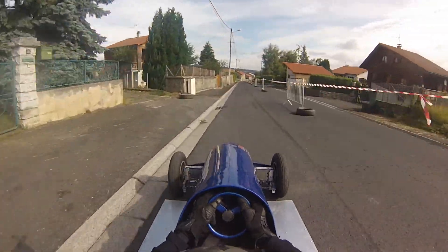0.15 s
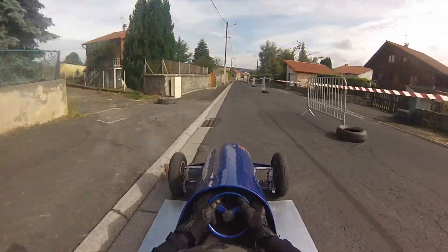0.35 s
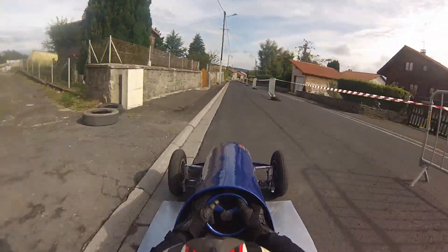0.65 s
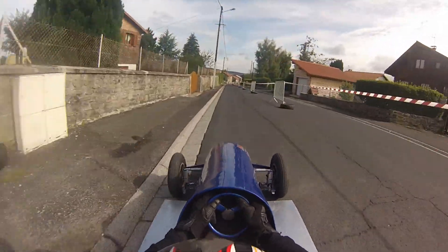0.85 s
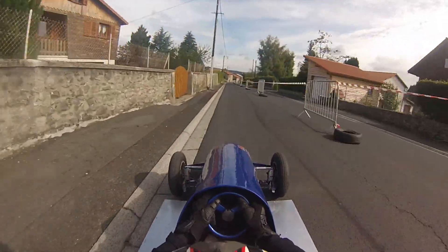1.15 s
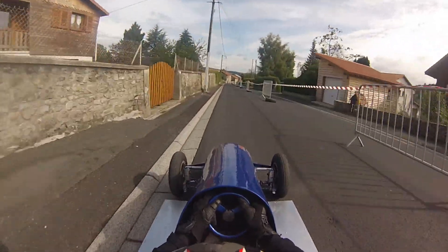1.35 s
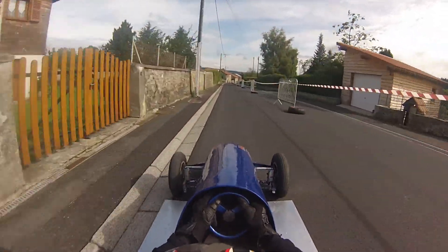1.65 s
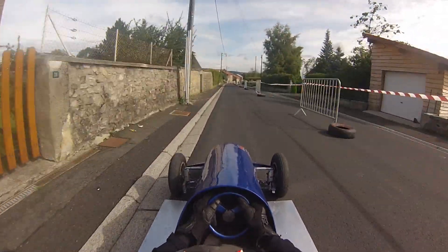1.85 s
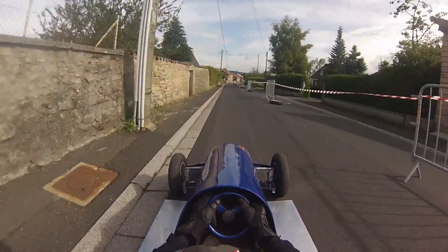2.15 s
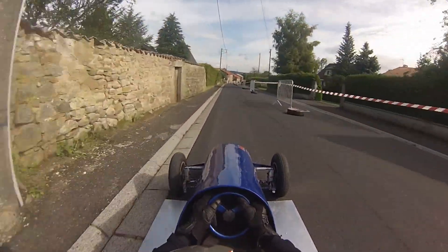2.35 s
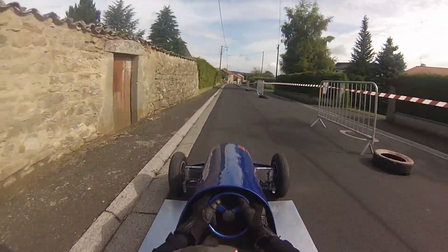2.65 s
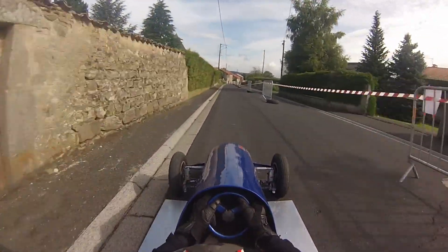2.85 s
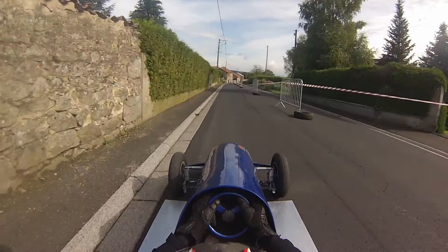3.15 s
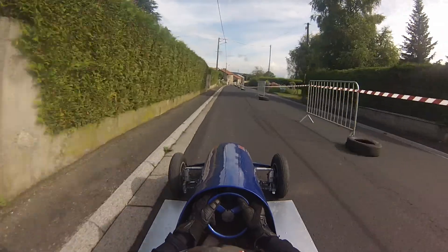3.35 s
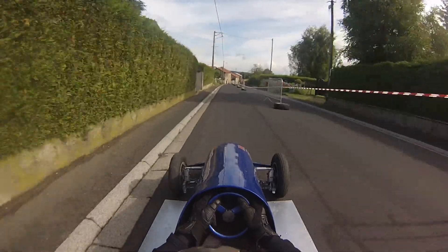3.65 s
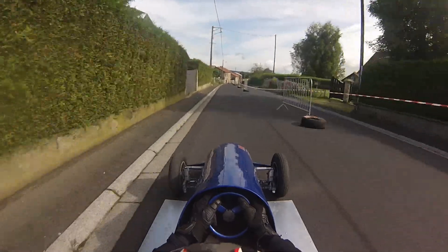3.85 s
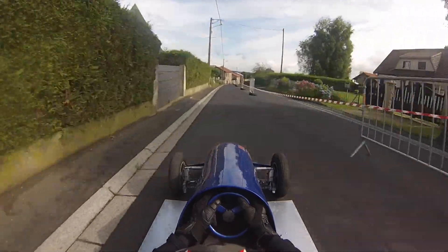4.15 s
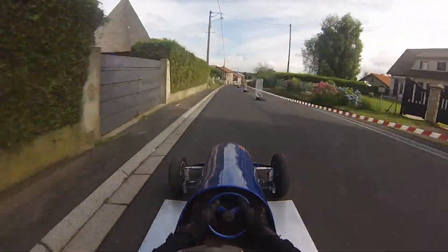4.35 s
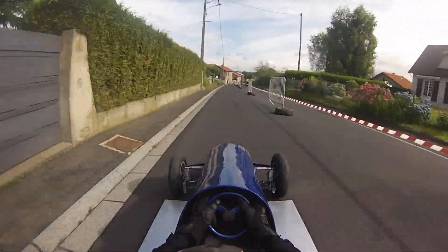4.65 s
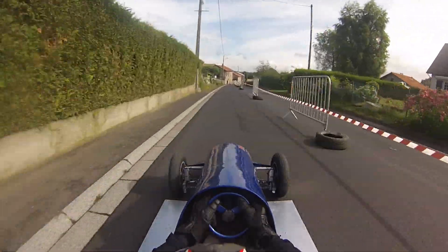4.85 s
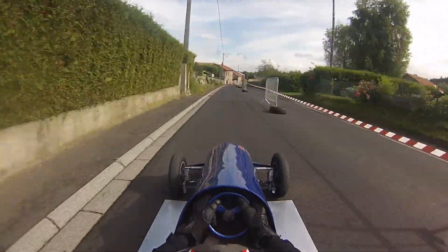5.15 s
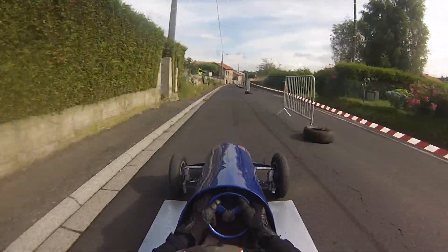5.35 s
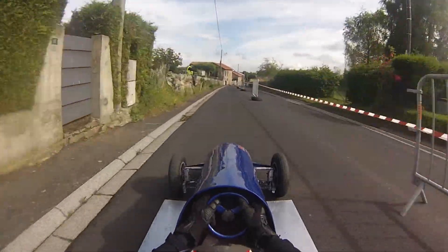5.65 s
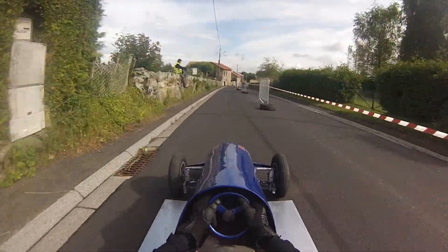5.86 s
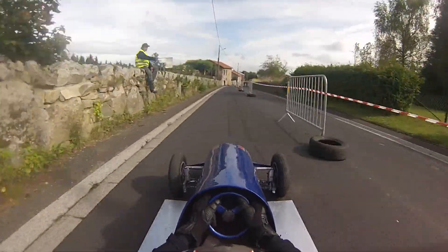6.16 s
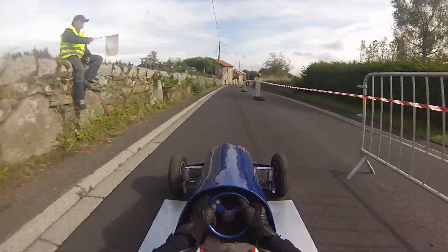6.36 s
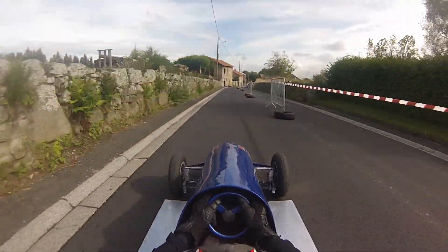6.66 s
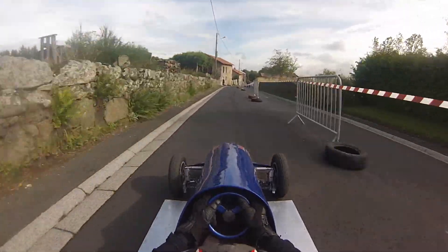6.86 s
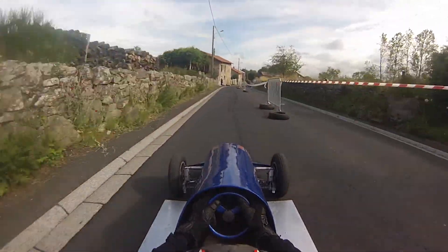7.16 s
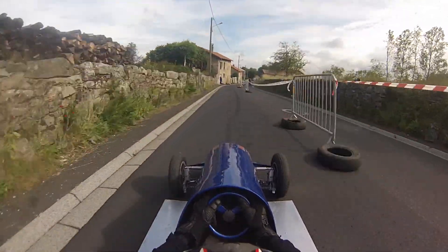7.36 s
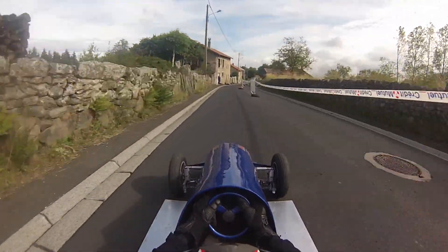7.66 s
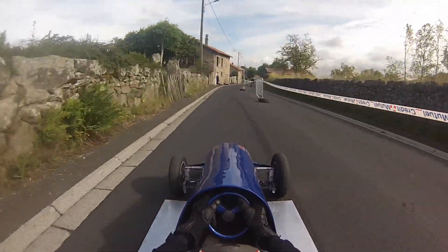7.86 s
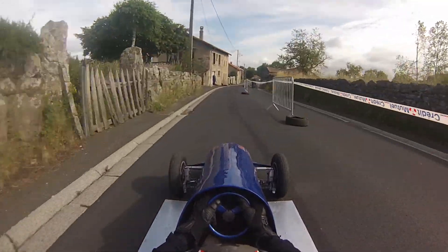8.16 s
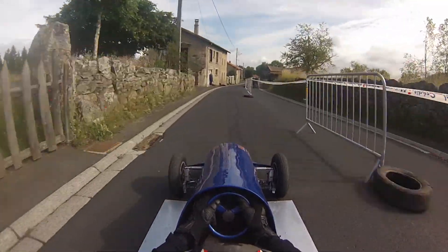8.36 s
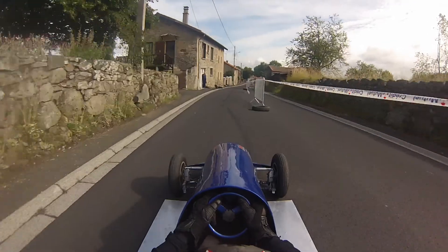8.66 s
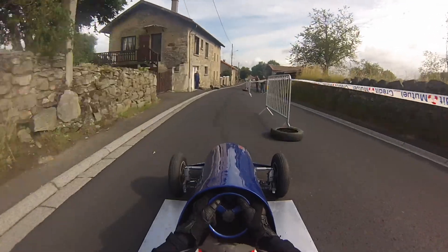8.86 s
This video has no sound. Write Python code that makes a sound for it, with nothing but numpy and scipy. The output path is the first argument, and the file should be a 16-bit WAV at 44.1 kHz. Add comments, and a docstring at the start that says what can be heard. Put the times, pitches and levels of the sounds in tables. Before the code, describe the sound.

Close on board an engineless soapbox car rolling down an open street, a deep, wavering shell boom dominates, with tyre roar and gritty hiss beneath. Early on a wheel drops onto a drain cover with a thud and rattle; hard knocks, tiny jingles and squeaks cluster in the first three seconds. The middle is smoother, with jolts that crackle, then a loud sharp knock comes near the end.

```python
"""A soapbox car's shell booms at about 100 Hz as it coasts down an asphalt street: a shaken resonance.
Below the boom the car bounces on its tyres, wind buffets the microphone, and hard swings crackle.
Coloured noise makes the tyres roar and hiss; short, ringing notes are rubber scrubbing sideways.
Runs of tiny clicks drive ringing parts, so the chassis knocks and loose fittings jingle.
A dry joint squeaks in brief wavering tones, and a drain cover rattles the chassis with a thud."""
import sys
import numpy as np
from scipy import signal
from scipy.fft import rfft, irfft
from scipy.io import wavfile
from scipy.ndimage import uniform_filter1d

SR = 44100
rng = np.random.default_rng(int(sys.argv[2]) if len(sys.argv) > 2 else 0)


def waveform_to_disk(signal):
    """Save audio, clipped to [-1, 1], as 16-bit WAV at the path in sys.argv[1]."""
    frames = np.transpose(np.atleast_2d(signal))
    scaled = np.clip(frames, -1, 1) * 32767
    samples = np.round(scaled).astype(np.int16)
    wavfile.write(sys.argv[1], SR, samples)


N = 397782
TIME = np.arange(N) / SR  # seconds

# how coarse the asphalt is, as the level it stirs up in the tyres: t/s, level/dB
ROAD_COARSENESS = [(0.0, -36), (0.68, -37), (1.0, -45), (1.48, -43.5), (1.71, -41.5), (2.16, -38),
                   (2.59, -40), (2.86, -34.5), (3.04, -38.5), (4.75, -36.5), (5.07, -44.5), (5.98, -41.5),
                   (6.16, -39.5), (6.51, -42.5), (7.08, -37), (7.81, -42.5), (8.11, -37.5), (9.02, -41.5)]
# smooth rises and falls of the bounce over humps and flat stretches: t/s, level change/dB
HUMPS = [(0.5, 4), (0.95, -6.5), (1.19, 10.5), (1.79, -3.5), (3.92, -7.5), (5.84, -8), (6.12, 4.5),
         (7.14, 5.5)]
# low, slow-pulsing wind noise, before its overall level: f/Hz, level/dB
WIND_SPECTRUM = [(10, -15.5), (22, -0.5), (40, -9), (60, 3.5), (80, 4.5), (120, 5), (160, -14), (220, -23),
                 (500, -46.5), (2000, -88.5)]
# fine crackle on the big swings, before its overall level: f/Hz, level/dB
CRACKLE_SPECTRUM = [(200, -14.5), (1500, 6), (3500, 2), (5500, 0), (8000, -5), (12000, -9), (15000, -17.5)]
# body panels that ring above the rolling tyres: f/Hz, width/Hz, lift/dB
PANELS = [(354.3, 50, 10.5), (495, 120, 6.5), (613, 10, 3.5), (886, 45, 7.5), (1003, 89, 10.5),
          (1123, 67, 9), (1387, 180, 11), (1593, 91, 12), (2650, 180, 6.5), (2970, 17, 9), (4520, 53, 7.5)]
# push of the tread and of the grit on the panels, before their overall levels: f/Hz, level/dB
TREAD_SPECTRUM = [(60, -11), (150, 6.5), (220, -5.5), (300, -6), (400, -11.5), (450, -2), (560, 3),
                  (680, 1), (770, -13), (1050, -18.5), (1400, -23.5), (2000, -41.5), (4000, -64)]
GRIT_SPECTRUM = [(300, -18), (800, -3.5), (1450, 3), (1800, -1), (2300, -0.5), (2900, -7), (3300, -12),
                 (5000, -22.5), (7000, -25), (10500, -37.5), (15000, -44.5)]
# coarse patches where the tread roars up: t/s, lift/dB
PATCHES = [(0.38, 3.5), (2.27, 5), (4.38, 4), (4.76, 2.5), (4.98, 2.5), (5.62, 4.5), (6.36, 6)]
# ways the struck chassis rings: f/Hz, width/Hz, lift/dB
CHASSIS = [(553, 67, 0), (990, 67, 8.5), (1370, 370, 7), (1625, 120, 8), (2550, 280, 8), (2870, 140, 7),
           (4220, 210, 9.5)]
# tone of a blow to the chassis, before its overall level: f/Hz, level/dB
BLOW_SPECTRUM = [(60, 5), (170, 6), (260, -4.5), (420, 3.5), (600, -1), (1300, -3), (1650, -4), (1900, -11),
                 (2700, -11), (3200, -19), (4400, -32.5), (5200, -34), (7200, -39.5), (9000, -55),
                 (15000, -57)]
# chassis knocks: t/s, peak level/dB, favoured ring f/Hz, chatter length/s, brightness/(dB per octave)
KNOCKS = [(0.0, -23, 1570, 0.013, 2.5), (0.669, -24, 1340, 0.014, 5), (0.722, -15.5, 1630, 0.008, -2.5),
          (0.746, -24, 2400, .008, -11), (0.816, -12.5, 1430, 0.0065, 0), (1.024, -24, 970, 0.011, 0.5),
          (1.032, -16.5, 1540, 0.012, 0.5), (1.274, -26, 1400, 0.043, -6.5),
          (1.537, -18.5, 920, 0.0092, -3.5), (1.546, -15.5, 1590, 0.019, -1), (1.628, -24, 1300, .012, -7),
          (1.675, -34, 1080, 0.013, -1.5), (2.204, -19.5, 1400, 0.013, 0.5),
          (2.378, -14.5, 1010, 0.0083, -6.5), (2.691, -21.5, 1130, 0.022, -3.5),
          (3.587, -18, 1030, 0.005, -3.5), (3.594, -17.5, 980, 0.018, -2),
          (5.765, -32.5, 976, 0.0071, -0.5), (5.935, -22, 1033, 0.017, -2.5),
          (6.061, -19.5, 970, 0.019, -5), (6.152, -17.5, 1620, 0.0092, -3.5),
          (7.169, -33.5, 1600, 0.011, 5), (8.237, -24.5, 1240, 0.018, -6), (8.684, -23.5, 1020, .01, -1),
          (8.695, -8.5, 980, 0.0085, 1.4), (8.765, -24.5, 810, 0.0077, -7.5),
          (8.851, -22, 1100, 0.0082, -4.5)]
# tone of a clinking fitting, before its overall level: f/Hz, level/dB
CLINK_SPECTRUM = [(600, -24), (1600, 5.5), (2100, -5), (2700, -0.5), (3500, -4), (4000, -16), (5600, -16.5),
                  (7200, -18), (8500, -34), (11000, -26.5), (14000, -41.5)]
# rattles of loose metal fittings: t/s, peak level/dB, chatter length/s
JINGLES = [(0.14, -43, 0.014), (0.25, -41.5, 0.042), (0.312, -34, 0.032), (0.441, -41, 0.011),
           (0.486, -31, 0.025), (0.498, -41, 0.013), (0.611, -38, .02), (0.667, -35, 0.017),
           (0.744, -23, 0.0099), (1.139, -45, 0.016), (1.921, -40.5, 0.024), (2.858, -39.5, 0.0047),
           (3.857, -38.5, 0.018), (4.174, -46.5, .015), (4.758, -46, 0.028), (6.107, -37, 0.033),
           (6.309, -43.5, 0.053), (6.39, -39.5, 0.025), (7.169, -38.5, 0.018), (8.292, -45.5, 0.018)]
# squeaks of a dry joint: t/s, peak level/dB, pitch f/Hz, length/s
SQUEAKS = [(0.309, -23, 2610, 0.015), (0.495, -31, 2600, 0.015), (0.574, -39, 2650, 0.015),
           (2.351, -23.5, 2830, 0.016), (8.664, -24.5, 2820, 0.013)]
# tyres scrubbing sideways under the steering: t/s, level of the note/dB
SCRUBS = [(0.337, -32), (1.928, -40), (2.077, -39.5), (2.248, -38.5), (2.578, -42), (2.762, -38.5),
          (2.852, -39), (3.19, -44), (3.739, -38), (4.762, -37.5), (7.362, -42)]
# hard jolts, with the size of swing each one steers towards: t/s, level/dB
JOLTS = [(0.390, -5.5), (0.646, -4.5), (2.179, -6), (2.427, -5), (2.596, -4.5), (3.353, -2.5),
         (4.486, -1.5), (4.809, -1), (4.868, -5), (5.138, -3.5), (6.576, -5), (6.72, -4), (8.449, -4.5)]
# gain of the rattle over the drain cover, joined by straight lines: t/s, level/dB
DRAIN = [(0.58, -62), (0.62, -32.5), (0.70, -40), (0.76, -30.5), (0.79, -40), (0.84, -30), (0.87, -49),
         (0.93, -37), (0.96, -80)]
# tone of the deep thud, before its overall level: f/Hz, level/dB
THUD_SPECTRUM = [(80, -9.5), (170, 4), (280, 1), (420, -14.5), (1000, -60.5)]

USUAL_ROAD_DB = -39  # coarseness of usual asphalt
PITCHING_HZ, PITCHING_BOUNCE_DB, PITCHING_BOOM_DB = 5, 2, 1.5  # swing traded between tyres and shell
HUMP_S, HUMP_BOOM_SHARE = 0.1, 0.27  # half-width; share of each hump taken back from the boom
PATCH_S = 0.066  # half-width of a coarse patch
BRIGHT_UP_TO_HZ = 4200  # a knock's brightness tilt stops here
SQUEAK_WAVER, SQUEAK_WAVER_HZ = 0.031, 600  # typical share of the pitch; speed limit of the waver
DROP_S, DROP_DB = 0.642, -17  # a wheel drops onto the drain cover: time, peak level of its thud
EDGE_HZ = 14900  # upper end of the sound


def amp(db):
    """Turns decibels into a plain multiplier."""
    return 10 ** (np.asarray(db) / 20)


def evened(x):
    """Scales a sound to an average strength (rms) of 1."""
    return x / np.sqrt(np.mean(x ** 2) + 1e-20)


def level(table, axis):
    """Turns one dB column into a multiplier at every sample."""
    rows = np.array(table)
    return amp(np.interp(TIME, rows[:, 0], rows[:, axis]))


def add(mix, s, sound):
    """Adds a sound into the mix, starting at s seconds."""
    part = mix[max(round(s * SR), 0):][:len(sound)]
    part += sound[:len(part)]


def response(spectrum, modes=(), size=8192):
    """The ring-out after one click, for a spectrum lifted by resonances; it never starts early."""
    hz = np.abs(np.fft.fftfreq(size, 1 / SR))
    points, values = np.transpose(spectrum)
    db = np.interp(np.log(hz + 1), np.log(points), values)
    for centre, width, lift in modes:
        db = db + lift / (1 + (2 * (hz - centre) / width) ** 2)
    # minimum phase: the energy comes as early as this spectrum allows
    log_spectrum = np.conj(signal.hilbert(np.log(amp(db))))
    return np.fft.ifft(np.exp(log_spectrum)).real[:size // 2]


def colour(x, spectrum, modes=()):
    """Gives a sound the tone of a spectrum and its resonances."""
    return signal.oaconvolve(x, response(spectrum, modes))[:N]


def drift(rate_hz):
    """Smooth random wandering of rms 1; a higher rate wanders faster."""
    hz = np.fft.rfftfreq(N, 1 / SR)
    smoothed = rfft(rng.standard_normal(N)) * np.exp(-(hz / rate_hz) ** 2)
    return evened(irfft(smoothed, N))


def ringing(hz, width_hz, steadiness):
    """A resonance shaken at random; steadiness 1 holds its swing most even."""
    swing = drift(width_hz) + 1j * drift(width_hz)
    swing = swing / (np.abs(swing) ** 2 + 0.35) ** (np.clip(steadiness, 0, 1) / 2)
    return evened((swing * np.exp(2j * np.pi * hz * TIME)).real)


def chatter(length, tail_db, tail_s, size=6000):
    """Parts bounce against each other in a quick, uneven run of contacts, then tremble to rest."""
    t = np.arange(size) / SR
    main_run = np.exp(-(t / max(length, .001)) ** 2)
    tail = amp(tail_db) * np.exp(-t / tail_s)
    contacts = rng.standard_normal(size) * (rng.random(size) < .16)
    bounces = 1 + .75 * np.cos(2 * np.pi * rng.uniform(130, 280) * t)
    return contacts * bounces * (main_run + tail)


def peaked(x, db):
    """Sets the rms of the loudest few milliseconds to a level."""
    return amp(db) * x / np.sqrt(uniform_filter1d(x ** 2, size=240).max() + 1e-20)


def rounded(x, ceiling):
    """Leaves small values almost alone and bends large ones towards a ceiling."""
    return x / (1 + (x / ceiling) ** 8) ** (1 / 8)


def on_road(db, slope):
    """Gain on usual asphalt, changed by slope dB for each dB of coarser road."""
    return amp(db) * (level(ROAD_COARSENESS, axis=1) / amp(USUAL_ROAD_DB)) ** slope


def swells(table, half_width_s):
    """Smooth rises and falls in dB, one for each row."""
    return sum(db * np.exp(-((TIME - s) / half_width_s) ** 2) for s, db in table)


def rumble():
    """The shell's narrow boom, a looser ring above it, the bounce on the tyres, and wind."""
    pitching = np.tanh(drift(PITCHING_HZ)) * 1.6  # the car rocks to and fro
    humps_db = swells(HUMPS, HUMP_S)
    boom = ringing(hz=100.64, width_hz=5.8, steadiness=1.0)
    boom += amp(-9.5) * ringing(hz=107.54, width_hz=15, steadiness=0.3)
    bounce = ringing(hz=44.34, width_hz=9.0, steadiness=0.67)
    gusts = amp(2.7 * drift(rate_hz=13))
    wind = amp(-24.0) * evened(colour(rng.standard_normal(N), WIND_SPECTRUM) * gusts)
    boom *= on_road(db=-18.5, slope=-0.13)
    boom *= amp(-PITCHING_BOOM_DB * pitching - HUMP_BOOM_SHARE * humps_db)
    bounce *= on_road(db=-24, slope=0.6)
    bounce *= amp(PITCHING_BOUNCE_DB * pitching + humps_db)
    return boom + bounce + wind


def crackle(swing):
    """A fine crackle rides on the low swings, growing steeply with their size."""
    crest = np.minimum(np.abs(swing) / 0.35, 1.35) ** 4.2
    grains = rng.standard_normal(N) * amp(5.2 * drift(rate_hz=1500))
    return amp(-53) * crest * evened(colour(grains, CRACKLE_SPECTRUM))


def tyres():
    """Tread and grit drive the panels; two groups of panel rings swell and fade partly on their own."""
    shared_db = 1.3 * drift(rate_hz=16)
    roar, hiss = np.zeros(N), np.zeros(N)
    for group in (PANELS[::2], PANELS[1::2]):
        # every panel rings, this group a little more
        modes = PANELS + [(hz, width, .25 * lift) for hz, width, lift in group]
        group_db = shared_db + 2.2 * drift(rate_hz=18)
        tread = rng.standard_normal(N) * amp(group_db + 1.7 * drift(rate_hz=13))
        grit = rng.standard_normal(N) * amp(1.1 * group_db + 2.8 * drift(rate_hz=150))
        roar += colour(tread, TREAD_SPECTRUM, modes)
        hiss += colour(grit, GRIT_SPECTRUM, modes)
    roar = evened(roar) * on_road(db=-37, slope=0.98) * amp(swells(PATCHES, PATCH_S))
    return roar + evened(hiss) * on_road(db=-47, slope=0.81)


def knocks():
    """Play in the chassis closes hard and rings the frame; each spot favours its own ring."""
    out = np.zeros(N)
    for s, db, ring_hz, length, bright in KNOCKS:
        blow = []
        for hz, gain in BLOW_SPECTRUM:
            octaves = np.log2(np.clip(hz, 500, BRIGHT_UP_TO_HZ) / 1400)
            blow.append((hz, gain + bright * octaves))
        contacts = chatter(length, tail_db=-19, tail_s=.018)
        hit = signal.fftconvolve(contacts, response(blow, CHASSIS + [(ring_hz, 320, 3)]))
        add(out, s, peaked(hit, db))
    return out


def jingle(db, length):
    """One small fitting rattles, with a few narrow rings of its own."""
    rings = [(hz, 120, 7) for hz in rng.uniform(2400, 7400, size=7)]
    contacts = chatter(length, tail_db=-23.0, tail_s=0.025)
    return peaked(signal.fftconvolve(contacts, response(CLINK_SPECTRUM, CHASSIS + rings)), db)


def jingles():
    """Fittings rattle at the bumps, and faintly at random moments all along the way."""
    out = np.zeros(N)
    for s, db, length in JINGLES:
        add(out, s, jingle(db, length))
    for when, size in rng.random((52, 2)):
        add(out, when * TIME[-1], jingle(-57 + 9 * size, 0.0077))
    return out


def squeaks():
    """Metal sticks and slips: a brief rasping tone with weak overtones, shaking the parts around it."""
    out = np.zeros(N)
    waver = drift(SQUEAK_WAVER_HZ)
    rasp = amp(3.5 * drift(rate_hz=150))
    for s, db, hz, length in SQUEAKS:
        t = TIME[:round(3 * length * SR)]
        now = round(s * SR) + np.arange(len(t))
        phase = 2 * np.pi * np.cumsum(hz * (1 + SQUEAK_WAVER * waver[now])) / SR
        tone = np.sin(phase) + amp(-28) * np.sin(2 * phase) + amp(-47) * np.sin(4 * phase)
        fade = (1 - np.exp(-t / 0.0018)) * np.exp(-(t / length) ** 2)
        add(out, s, peaked(tone * rasp[now] * fade, db))
        add(out, s, jingle(db - 19.5, length))
    return out


def scrubs():
    """Slipping rubber sings a short rough note with a weak octave and stirs the panel mode above it."""
    slip = np.zeros(N)
    for s, db in SCRUBS:
        add(slip, s, amp(db) * signal.windows.tukey(round(.068 * SR), .7))
    note = ringing(hz=1020, width_hz=70, steadiness=.2)
    octave = amp(-19) * evened(note ** 2 - 1)  # squaring doubles the pitch
    panel = amp(-7) * ringing(hz=1400, width_hz=110, steadiness=0)
    return slip * (note + octave + panel)


def jolted(swing):
    """Each jolt steers the shell to one big swing; the drop onto the drain cover also thuds."""
    size = np.abs(signal.hilbert(swing))  # outline of the swing
    gain, thud = np.ones(N), np.zeros(N)
    t = np.arange(-1600, 1600) / SR
    for s, db in JOLTS:
        near = round(s * SR) + np.arange(len(t)) - len(t) // 2
        change = amp(db) / (size[near] + 0.08) - 1
        add(gain, s + t[0], change * np.exp(-(t / 0.0083) ** 2))
    add(thud, DROP_S, peaked(response(THUD_SPECTRUM), DROP_DB))
    return swing * gain + thud


def drain():
    """The cover's bars shake the whole chassis in quick spurts; then the shell drones for a moment."""
    shaking = rng.standard_normal(N) * amp(4.5 * drift(rate_hz=160))
    inside = (TIME > DRAIN[0][0]) & (TIME < DRAIN[-1][0])
    rattle = evened(colour(shaking, BLOW_SPECTRUM, CHASSIS))
    rattle += amp(2.5) * evened(colour(shaking, THUD_SPECTRUM))
    out = rattle * level(DRAIN, axis=1) * inside
    drone = np.sin(2 * np.pi * 290 * TIME[:round(.09 * SR)])
    add(out, .865, amp(-26.5) * drone * signal.windows.tukey(len(drone), .6))
    return out


def scene():
    """Adds the layers; large swings of the rumble are rounded off, so its loudness stays more even."""
    swing = jolted(rounded(rumble(), ceiling=0.44))
    rolling = swing + crackle(swing) + tyres()
    return (rolling + knocks() + jingles() + squeaks() + scrubs() + drain())[None]


def record(dry):
    """Rounds off the loudest peaks, then removes the highest pitches."""
    low_pass = signal.firwin(511, EDGE_HZ, window=("kaiser", 9), fs=SR)[None]
    return signal.oaconvolve(rounded(dry, ceiling=1.0), low_pass, "same")


dry = scene()
out = record(dry)
waveform_to_disk(out)
```